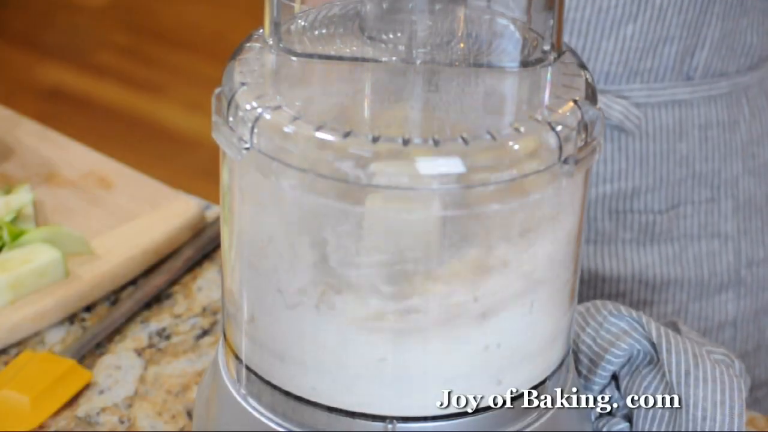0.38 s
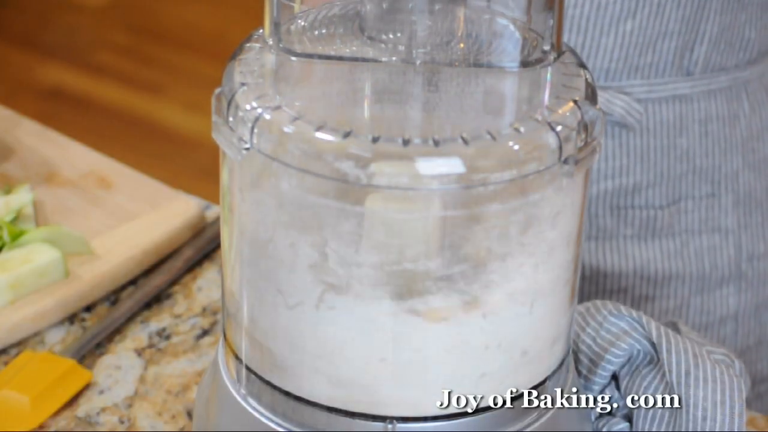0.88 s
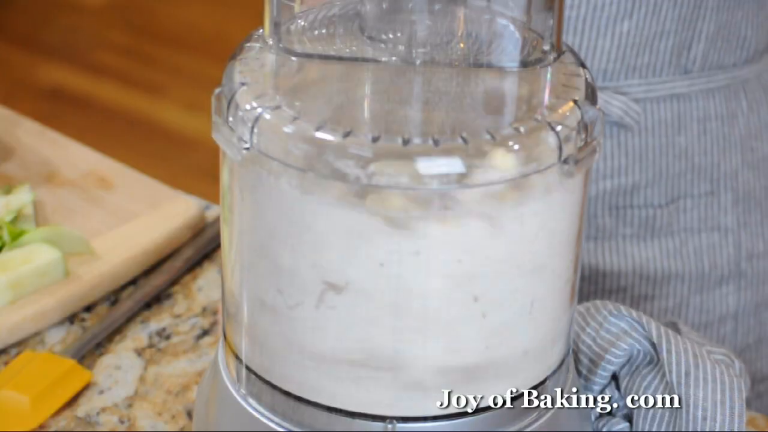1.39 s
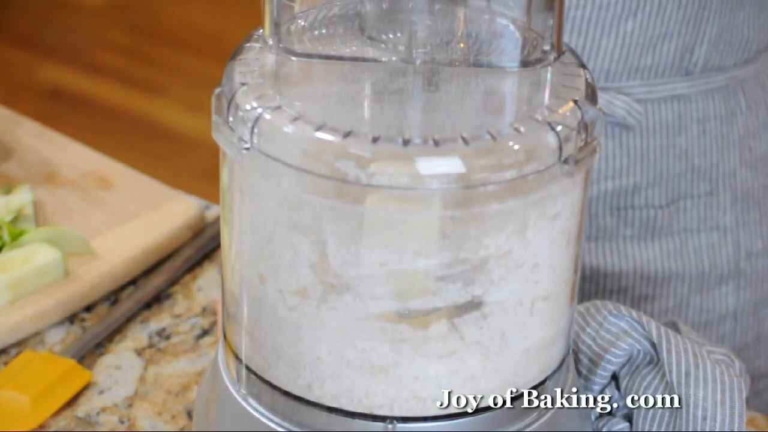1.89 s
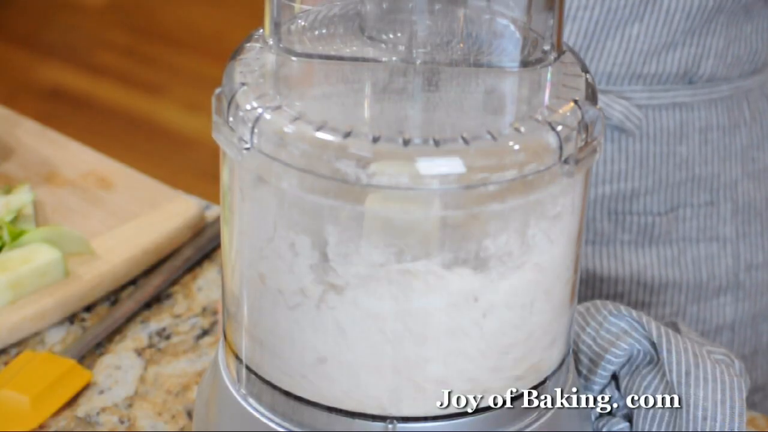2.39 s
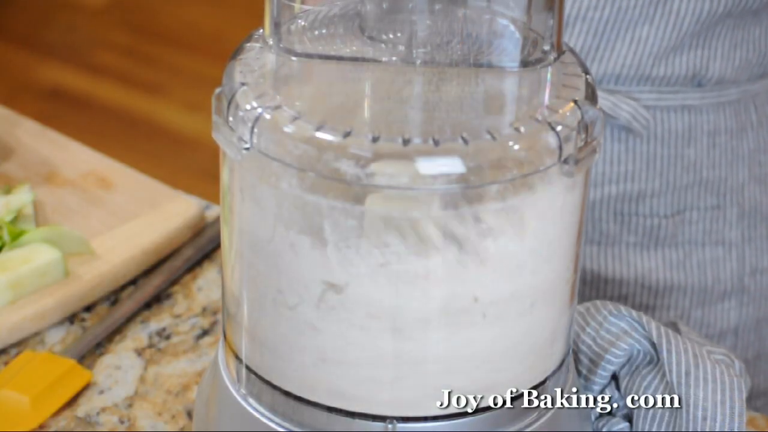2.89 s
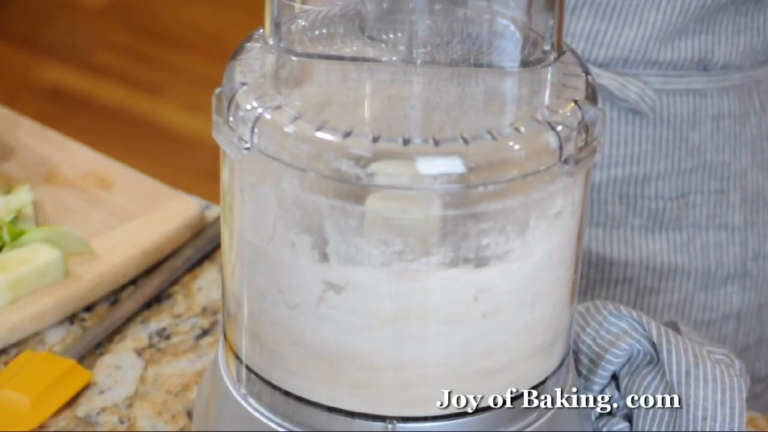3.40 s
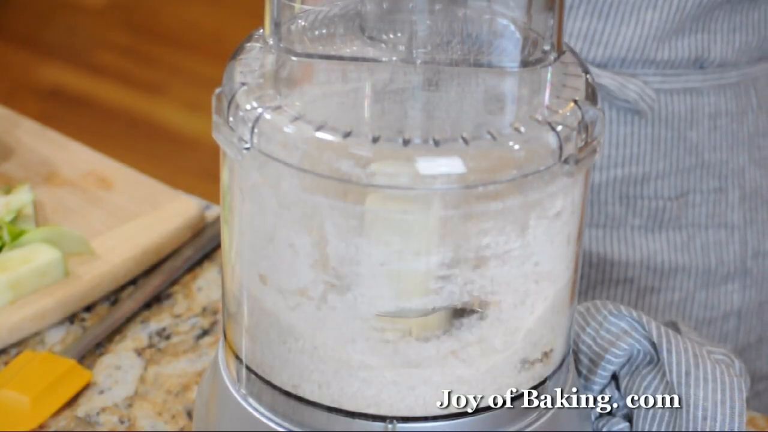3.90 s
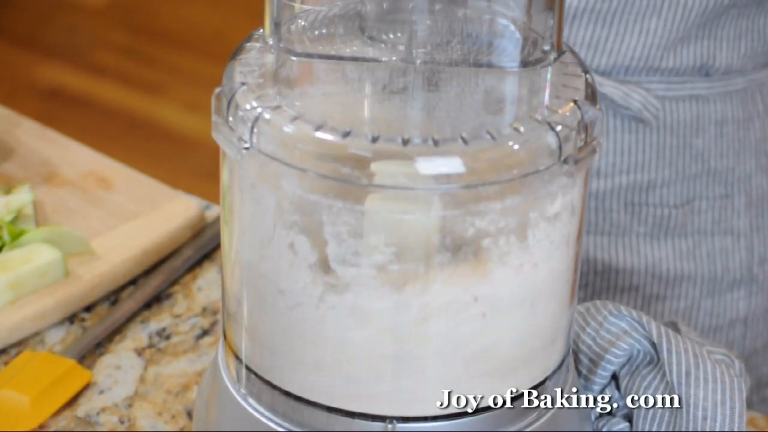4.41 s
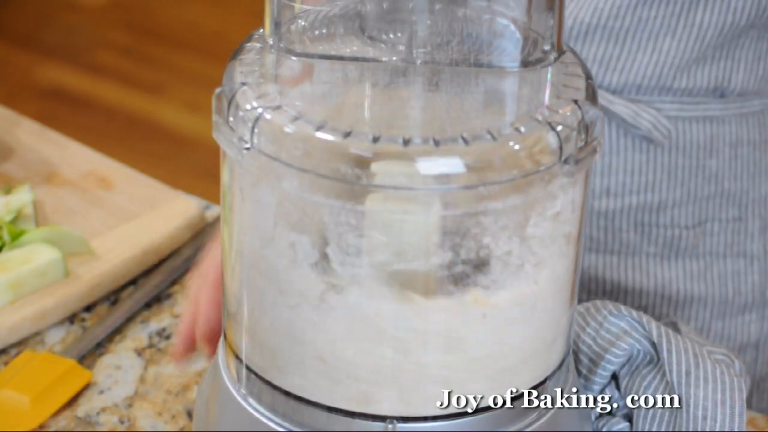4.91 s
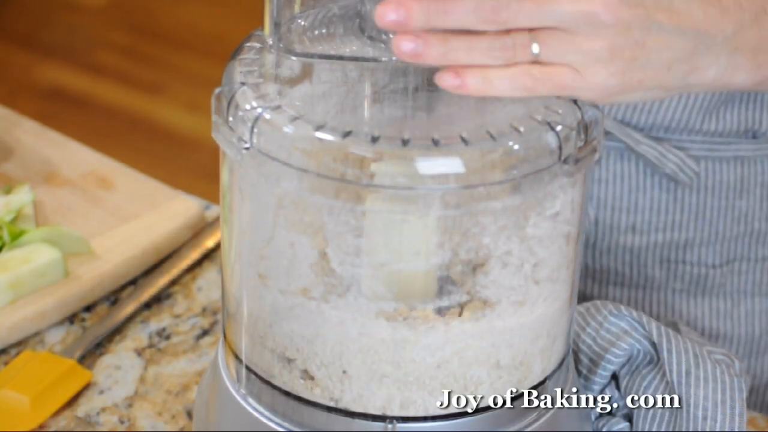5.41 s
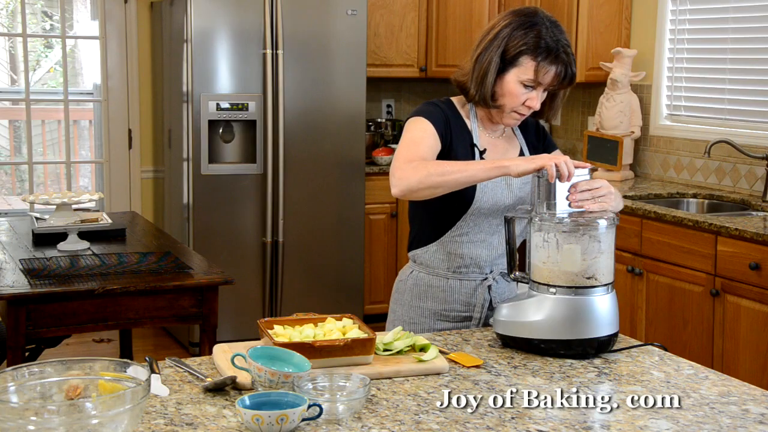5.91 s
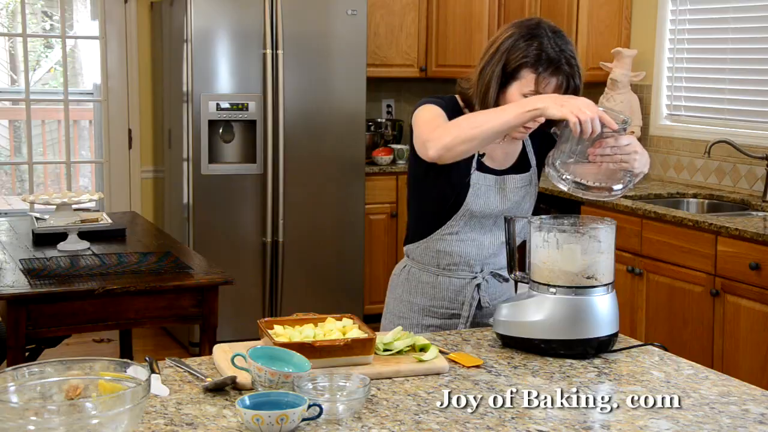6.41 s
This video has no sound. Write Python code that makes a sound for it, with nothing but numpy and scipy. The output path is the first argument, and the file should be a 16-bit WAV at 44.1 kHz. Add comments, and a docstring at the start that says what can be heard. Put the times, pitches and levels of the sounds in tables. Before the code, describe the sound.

Close to the microphone in a hard-walled kitchen, with a soft low hum throughout, a food processor is just coasting down. At about 0.1 s it starts again with a dull click and churns until 0.8 s: a dense, grainy roar of crumbs drumming on plastic, hard lumps knocking, a faint wavering steel ring near 1.9 kHz. Shorter bursts follow at 1.2-1.6 and 1.95-2.3 s, then a longer one from 2.6 to 3.5 s, most preceded by little clicks. Three quick pulses come at 3.95, 4.4 and 4.7 s, almost running together, with bright knocks and jolts at braking. The machine fades to rest just after 5 s. From 5.3 s hands bump the bowl softly; the lid clicks and knocks around 5.55 s, rattles brightly, snaps loudly at 5.9 s with a brief echo, and gives a few last light clicks near 6.1 s. Then only hum.

```python
"""A food processor on a stone counter coasts down, then is pulsed in seven short runs, most with button clicks:
crumbs and lumps drum the plastic bowl, the steel blade rings faintly. Then hands rock the bowl and the lid is
twisted off with clicks and a loud snap. Shaped noise makes crumbs and hum, wandering tones the blade, struck
modes the knocks; a hard-walled kitchen echoes machine and hands over a quiet hum from start to end."""
import sys
import numpy as np
from scipy import signal
from scipy.fft import rfft, irfft
from scipy.io import wavfile
from scipy.ndimage import uniform_filter1d

SR = 44100
rng = np.random.default_rng(int(sys.argv[2]) if len(sys.argv) > 2 else 0)


def undo_db(level):
    """Turn decibels back into plain size, where 20 dB means ten times bigger."""
    steps = np.asarray(level, float) / 20
    return 10 ** steps


def to_wav(sig):
    """Store sig (one row per channel, or 1-D mono) as 16-bit WAV at the path in sys.argv[1].

    Samples outside -1..1 are clipped; the rate is SR.
    """
    pcm = np.clip(np.atleast_2d(sig), -1, 1) * 32767
    pcm = np.round(pcm).astype(np.int16)
    wavfile.write(sys.argv[1], SR, pcm.T)  # frames by channels


N = 288414  # samples


def unit_rms(x):
    """Scaled to rms 1."""
    return x / np.sqrt(np.mean(x ** 2))


def unit_peak(x):
    """Scaled to peak 1."""
    return x / abs(x).max()


def colour(x, gain):
    """Filter by a gain that is a function of Hz."""
    hz = np.arange(len(x) // 2 + 1) * SR / len(x)
    return irfft(rfft(x) * gain(np.maximum(hz, 1)), len(x))


def slope(table):
    """Gain through (frequency [Hz], level [dB]) points on a log axis."""
    hz, db = np.transpose(table)
    return lambda f: undo_db(np.interp(np.log(f), np.log(hz), db))


def band(lo_hz, hi_hz):
    """Soft-edged pass band."""
    return lambda f: 1 / np.sqrt((1 + (lo_hz / f) ** 6) * (1 + (f / hi_hz) ** 6))


def resonance(f, hz, width_hz):
    """Response of one resonance, 1 at its centre."""
    return 1 / (1 + 1j * (f - hz ** 2 / f) / width_hz)


def modes_response(f, hz, db, t60_s):
    """Response of a set of modes; one of decay t60 is ln(1000) / (pi t60) Hz wide."""
    widths_hz = np.log(1000) / np.pi / np.asarray(t60_s)
    # the factor t60 makes db the level at which a struck mode starts
    return sum(undo_db(g) * t * resonance(f, h, w) for h, g, t, w in zip(hz, db, t60_s, widths_hz))


def walk(rate_hz):
    """Random levels held 1 / rate s and slewed twice; spread near 1."""
    hold = int(SR / rate_hz)
    steps = np.repeat(rng.standard_normal(N // hold + 1), hold)
    return 1.3 * uniform_filter1d(uniform_filter1d(steps, hold), hold)[:N]


HEAVE_RATE_HZ = 18
# boom, body, blade, spray, hiss against a run: (level [dB], shortfall at switch-on [dB], spin-up [s],
# start kick [dB], braking jolt [dB], jolt fade [s], first drop [dB], coasting [dB/s], drift as mix gets finer [dB/s])
LAYER_FOLLOW = [(-7.3, 22, .07, 3, 8, .03, 7, 80, .01), (.1, 15, .07, 1.1, 3.5, .02, 5.5, 63, .01),
                (-17.5, 22, .2, .1, 11.5, .6, 3, 66, .7), (-7.8, 25, .075, 4, 2.1, .02, 10, 74, -.3),
                (-32.5, 25, .075, 3, .1, .02, 12, 70, -.6)]


def processor():
    """Crumbs drum the bowl wall; boom, body, blade ring, spray and hiss rise and fall with each run."""
    t = np.arange(N) / SR
    wall = bowl_wall()
    edges_hz = [(60, 320), (320, 2400), (2400, 7500), (7500, 20000)]
    boom, body, spray, hiss = (unit_rms(colour(wall, band(*pair))) for pair in edges_hz)
    # the small knocks fade as the pieces are cut finer
    body = undo_db(-6) * body + undo_db(-10 - 1.7 * t) * nuts()
    layers = boom, body, blade(), spray, hiss
    machine = sum(layer_gain(t, *row) * layer for row, layer in zip(LAYER_FOLLOW, layers))
    shared_heave_db = 0.7 * walk(HEAVE_RATE_HZ)
    return undo_db(shared_heave_db) * machine


# presses of the button: (on [s], held [s], level [dB], braking jolt [1 = hard], coasting pace [1 = usual])
RUNS = [(-.9, .8, -22, .1, 1.01), (.115, .69, -23.7, .1, 1.01), (1.2, .41, -24, .65, .95),
        (1.955, .33, -24.5, .2, 1.1), (2.63, .905, -23.7, .45, 1.2), (3.955, .275, -24, .8, 1.25),
        (4.37, .23, -25, 1.25, 1.5), (4.672, .239, -24.5, .99, 1.1)]


def layer_gain(t, db, short_db, spin_s, kick_db, jolt_db, jolt_s, drop_db, coast_db_s, finer_db_s):
    """Gain of one layer: every run spins up, kicks, holds, jolts at the brake and coasts to rest."""
    grip_s, kick_fade_s, jolt_rise_s, drop_s, standstill_s = .012, .05, .025, .06, .3
    power, off = 0, -np.inf
    for on, held, run_db, jolt, pace in RUNS:
        # a blade that still turns is up to speed sooner
        still = min((on - off) / standstill_s, 1)
        since_on, off = t - on, on + held
        coasting = pace * np.maximum(t - off, 0)
        speed = np.clip(since_on / spin_s / still, 0, 1)
        kick = still * speed * np.exp(-np.maximum(since_on - spin_s * still, 0) / kick_fade_s)
        brake = jolt * np.exp(-(np.minimum(t - off, 0) / jolt_rise_s) ** 2 - coasting / jolt_s)
        level_db = run_db - short_db * still * (1 - speed)
        level_db = level_db + kick_db * kick + jolt_db * brake
        level_db = level_db - drop_db * (1 - np.exp(-coasting / drop_s)) - coast_db_s * coasting
        power = power + np.clip(since_on / grip_s, 0, 1) ** 2 * undo_db(2 * level_db)
    own_heave_db = 1.3 * walk(HEAVE_RATE_HZ)
    return np.sqrt(power) * undo_db(db + finer_db_s * t + own_heave_db)


# spectrum of crumbs on plastic: (frequency [Hz], density [dB per Hz])
CRUMB_SPECTRUM = [(60, -58), (125, -11), (260, -12), (500, -10), (1000, -4), (1500, -9.5), (2400, -12.5),
                  (3900, -18.5), (5400, -31.5), (8000, -42), (12000, -50.5), (14000, -51), (15500, -64)]
# bowl resonances: (frequency [Hz], width [Hz], level against the crumbs [dB])
BOWL_MODES = [(218, 22, 8.5), (347, 71, -3.5), (618, 180, 2.5), (722, 61, 10), (1320, 90, -7),
              (3088, 190, 3.5), (5900, 490, -0.5)]


def bowl_wall():
    """The hail of crumbs coloured by the plastic and by the resonances of the bowl."""
    plain = slope(CRUMB_SPECTRUM)
    return colour(crumbs(), lambda f: plain(f) * (
        1 + sum(undo_db(db) * resonance(f, hz, width_hz) for hz, width_hz, db in BOWL_MODES)))


def crumbs():
    """A dense hail of small impacts of very uneven size over a hiss of flour, arriving in gusts."""
    rate_hz, spread_db, largest_db = 3000, 3.5, 17
    size_db = np.minimum(spread_db * rng.exponential(size=N), largest_db)
    hail = (rng.random(N) < rate_hz / SR) * undo_db(size_db) * rng.choice([-1, 1], N)
    flour = 1.3 * rng.standard_normal(N)
    gusts_db = .4 * walk(25) + 1.5 * walk(130)
    return (unit_rms(hail) + flour) * undo_db(gusts_db)


# steel modes: (multiple of the ring frequency [1], width [Hz], level [dB])
BLADE_MODES = [(1.02, 75, 0), (.96, 110, -1), (1.07, 90, -9)]


def blade():
    """Steel modes kept ringing by the crumbs: each a tone whose size and phase wander within its width."""
    ring_hz = 1915 * (1 + .015 * walk(6))
    phase = 2 * np.pi * np.cumsum(ring_hz) / SR
    out = 0
    for multiple, width_hz, db in BLADE_MODES:
        sine, cosine = (colour(rng.standard_normal(N), lambda f: 1 / (1 + (2 * f / width_hz) ** 2))
                        for _ in range(2))
        tone = sine * np.sin(multiple * phase) + cosine * np.cos(multiple * phase)
        out = out + undo_db(db) * unit_rms(tone)
    return unit_rms(out)


# bowl modes under nuts and lumps: (frequency [Hz], level [dB], t60 [s])
LUMP_MODES = [(700, 0, .04), (950, 0, .035), (1150, 0, .035), (1350, -1, .03), (1600, -1, .03),
              (1850, 0, .035), (1980, 0, .03), (2450, -4, .018), (3050, -4, .015), (3350, -5, .015),
              (4300, -12, .01)]


def nuts():
    """Pieces of nut and cold butter flung at the wall, each spot ringing one mode of the bowl."""
    rate_hz = 70  # over all modes
    out = 0
    for mode in LUMP_MODES:
        hit = rng.random(N) < rate_hz / len(LUMP_MODES) / SR
        taps = hit * undo_db(4.4 * rng.random(N))
        out = out + colour(taps, lambda f: modes_response(f, *np.transpose([mode])) * band(300, 4500)(f))
    return unit_rms(out)


# lumps on the bowl: (time [s], peak level [dB], brightest pitch [Hz])
LUMP_HITS = [(0.063, -19, 972), (0.434, -10, 1750), (0.514, -10, 1980), (0.591, -10, 1140),
             (0.721, -10, 1330), (0.902, -22, 958), (0.984, -25, 931), (1.034, -24, 910),
             (1.062, -25, 1560), (1.615, -14, 1870), (1.816, -26, 1040), (2.275, -10, 2480),
             (2.375, -22, 942), (3.55, -11, 1890), (4.044, -12, 1290), (4.075, -8, 1800),
             (4.585, -10, 1890), (4.7, -7, 1900), (4.875, -13, 1980), (5.123, -34, 1930)]


def lumps():
    """Lumps knock the bowl and ring its short plastic modes."""
    contact_ms = 1.2
    events = [(*row, contact_ms) for row in LUMP_HITS]
    return knocks(events, LUMP_MODES, reach_oct=.55, detune=.015, soft_hz=3200, tap=6)


# button clicks, pressed, latched or let go: (time [s], peak level [dB], brightest pitch [Hz])
BUTTON_CLICKS = [(0.118, -31, 716), (1.168, -35, 3330), (1.2, -28, 692), (1.922, -34, 2020),
                 (1.958, -28, 738), (2.597, -35, 3160), (2.632, -30, 738), (3.894, -37, 1170),
                 (3.923, -35, 2770), (3.956, -26, 662), (4.257, -29, 4300), (4.399, -22, 708)]
# button modes: (frequency [Hz], level [dB], t60 [s])
BUTTON_MODES = [(700, 3, .09), (1150, -2, .025), (1700, -3, .02), (2600, 0, .012), (3300, 3, .018),
                (3700, -2, .012), (4500, -6, .01), (6200, -8, .008)]


def button():
    """The pulse button taps its stops and rings its modes."""
    contact_ms = 1.1
    events = [(*row, contact_ms) for row in BUTTON_CLICKS]
    return knocks(events, BUTTON_MODES, reach_oct=1.1, detune=.015, soft_hz=5000, tap=6)


# lid locks and rims: (time [s], modal peak level [dB], brightest pitch [Hz], contact [ms], crack level [dB])
LID_HITS = [(5.433, -41, 856, 3.1, -40), (5.448, -42, 700, 5.1, -40), (5.461, -36, 965, 4.1, -26),
            (5.506, -45, 797, 5.1, -40), (5.516, -43, 700, 4.1, -40), (5.532, -46, 2740, 6.3, -21),
            (5.548, -18, 3050, 7.5, -23.5), (5.561, -9.5, 766, 4.2, -37.5), (5.633, -23, 1110, 3.3, -34),
            (5.645, -22, 2370, 1.4, -27), (5.677, -50, 748, 2.5, -14), (5.696, -24, 3170, 2.5, -10),
            (5.769, -31, 2980, 2.2, -13.5), (5.852, -30, 800, 2.1, -17.5), (5.899, -8, 840, 6, -36),
            (5.908, -15.5, 807, 1.2, -32.5), (5.915, -.6, 1500, 3.6, -29), (5.927, -6, 2460, 3.5, -27),
            (6.066, -29, 1650, 2.8, -21.5), (6.084, -22, 2760, 3.4, -19), (6.099, -26, 2770, 2.5, -28.5),
            (6.139, -34, 1610, 2.5, -29)]
# lid modes: (frequency [Hz], level [dB], t60 [s])
LID_MODES = [(700, -5, .04), (790, -2, .03), (921, -1, .025), (1150, -5, .025), (1350, -7, .02),
             (1570, -28, .45), (1620, 0, .025), (1640, -27, .5), (1700, -26, .5), (1770, -28, .45),
             (1760, -2, .025), (2073, -4, .018), (2422, -2, .018), (2650, 1, .02), (2950, -3, .015),
             (3311, -6, .014), (3801, -6, .014), (4371, -13, .01), (4915, -13, .012)]


def lid():
    """Locks and rims of the twisted lid ring its modes, clatter without pitch and crack brightly."""
    return knocks(LID_HITS, LID_MODES, reach_oct=1.37, detune=.035, soft_hz=3800, tap=.79)


# the hand's pushes: (time [s], peak level [dB])
PUSHES = [(5.343, -44), (5.433, -43), (5.461, -32), (5.506, -37), (5.548, -32), (5.561, -25), (5.574, -32),
          (5.696, -37), (5.899, -32), (5.915, -22), (6.084, -43), (6.139, -40)]
# bowl rocking on its base: (frequency [Hz], level [dB], t60 [s])
THUD_MODES = [(160, 0, .15), (205, 0, .07), (340, 0, .04), (500, -5, .03)]


def pushes():
    """The hand's pushes rock the bowl on its base: low, damped modes."""
    bright_hz, contact_ms = 260, 2.5
    events = [(*row, bright_hz, contact_ms) for row in PUSHES]
    return knocks(events, THUD_MODES, reach_oct=9, detune=.01, soft_hz=4570, tap=.8)


def knocks(events, modes, reach_oct, detune, soft_hz, tap):
    """Each blow is a tap and a rattle of a few ms that ring the modes near its brightest pitch most."""
    out, t = np.zeros(N + SR // 2), np.arange(SR // 2) / SR
    hz, db, t60_s = np.transpose(modes)
    yielding = signal.butter(4, soft_hz, fs=SR, output="sos")
    rims = signal.butter(4, 850, "high", fs=SR, output="sos")
    for time_s, peak_db, bright_hz, contact_ms, *crack_db in events:
        size, tune = rng.standard_normal((2, len(modes)))
        decay = np.exp(-1000 * t / max(contact_ms, .2))
        rattle = rng.standard_normal(len(t)) * decay * np.minimum(t / .001, 1)
        near_db = -6 * np.minimum((np.log2(hz / bright_hz) / reach_oct) ** 2, 3)
        gains_db = db + near_db + 1.5 * size
        # a yielding contact carries little treble
        soft = signal.sosfilt(yielding, rattle + tap * (t == 0))
        tuned_hz = hz * (1 + detune * tune)
        blow = unit_peak(colour(soft, lambda f: modes_response(f, tuned_hz, gains_db, t60_s)))
        if crack_db:
            # loose rims rattle without pitch, hard rims add a bright crack
            clatter = undo_db(-3.5) * unit_peak(signal.sosfilt(rims, soft))
            crack = undo_db(crack_db[0]) * unit_peak(colour(rattle, band(6500, 11500)))
            blow = blow + clatter + crack
        out[int(time_s * SR):][:len(t)] += undo_db(peak_db) * blow
    return out[:N]


# echo bands: (frequency [Hz], t60 [s], level [dB])
ROOM_BANDS = [(132, 0.66, 3), (250, 0.54, 7), (463, 0.42, -5), (1010, 0.52, 4.5), (1720, 0.94, -5),
              (2780, 0.4, -2), (5250, 0.5, -1.5), (10000, 0.3, 6)]


def kitchen(x):
    """Diffuse echo of hard walls: noise bands, each with its own decay, starting after the first bounce."""
    t = np.arange(SR) / SR
    tail = 0
    for hz, t60_s, db in ROOM_BANDS:
        noise = colour(rng.standard_normal(SR), band(hz / 1.4, hz * 1.4))
        tail = tail + undo_db(db - 60 * t / t60_s) * noise
    tail = tail * np.clip((t - .004) / .004, 0, 1)
    return signal.fftconvolve(x, tail / np.sqrt(np.sum(tail ** 2)))[:N]


# hum spectrum: (frequency [Hz], density [dB per Hz])
HUM_SPECTRUM = [(18, -38), (30, -8), (64, 4.5), (88, -16.5), (249, 0), (1020, -6.5), (1640, -8),
                (2020, -8.5), (5590, -24.5), (8280, -28.5), (15500, -36)]


def hum():
    """Appliances and air in the still room: shaped noise of slightly wavering level."""
    level_db = -56.5 + .4 * walk(5)
    return undo_db(level_db) * unit_rms(colour(rng.standard_normal(N), slope(HUM_SPECTRUM)))


def plastic_shell(x):
    """A light plastic shell radiates little deep bass."""
    return colour(x, lambda f: 1 / np.sqrt(1 + (117 / f) ** 8))


def scene():
    """Machine and hands close by, their echo and the hum behind."""
    churn = processor()
    hits = lumps() + button() + lid() + pushes()
    echo = kitchen(undo_db(-11.5) * hits + undo_db(-17.5) * churn)
    near = plastic_shell(churn + hits + echo)
    return (near + hum())[None]


# treble dips: (frequency [Hz], width [Hz], depth [0-1])
MIC_DIPS = [(5710, 530, 1), (7120, 210, .6)]


def microphone(x):
    """Two narrow resonances take energy out of the lower treble."""
    return colour(x, lambda f: 1 - sum(depth * resonance(f, hz, width_hz) for hz, width_hz, depth in MIC_DIPS))


def low_pass(x):
    """Removes everything above the highest recorded frequency."""
    return signal.sosfilt(signal.butter(12, 15940, fs=SR, output="sos"), x)


def record(dry):
    """The microphone hears the scene with two dips in the lower treble."""
    heard = microphone(dry[0])[None]
    return low_pass(heard)


dry = scene()
out = record(dry)
to_wav(out)
```